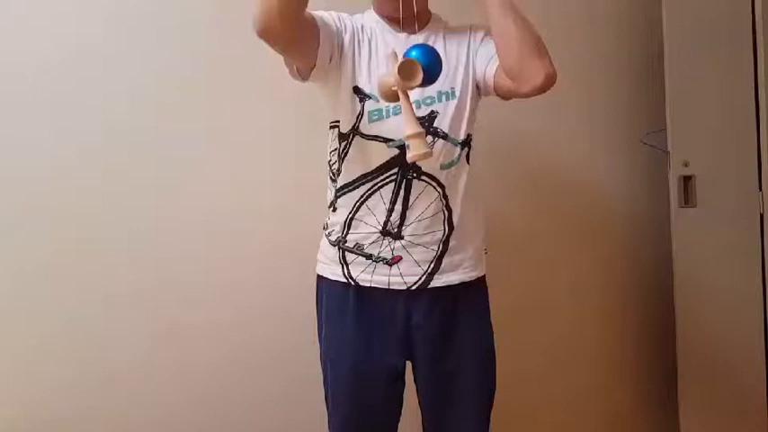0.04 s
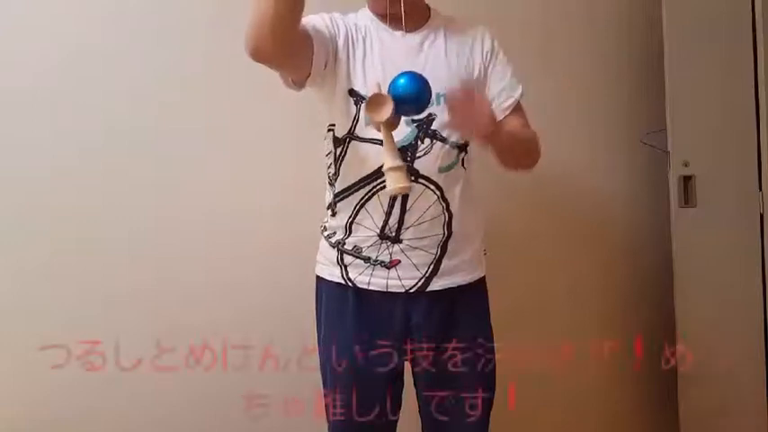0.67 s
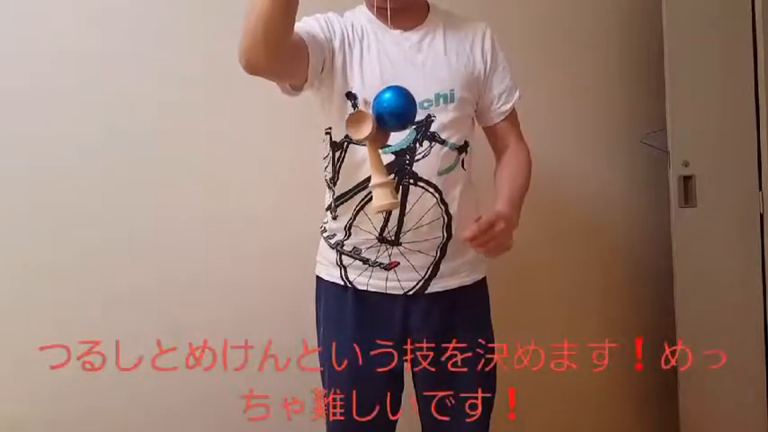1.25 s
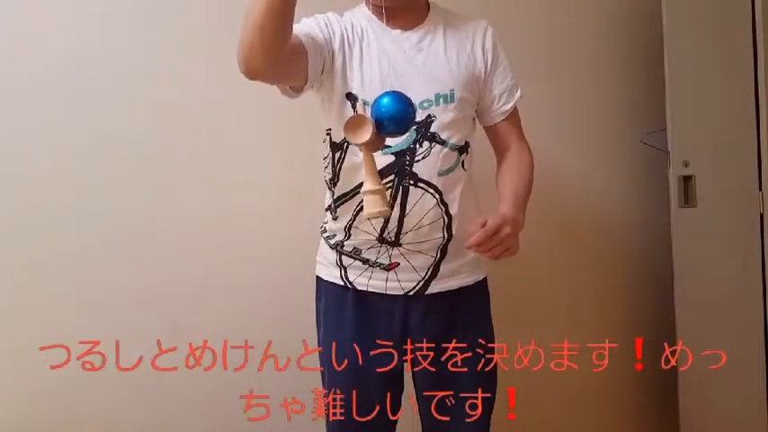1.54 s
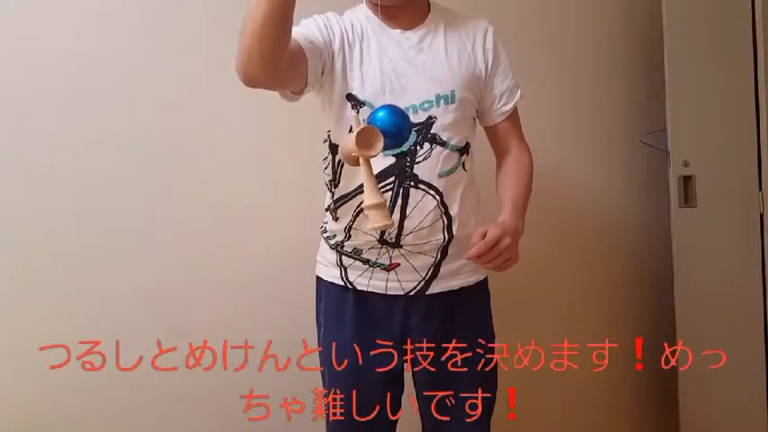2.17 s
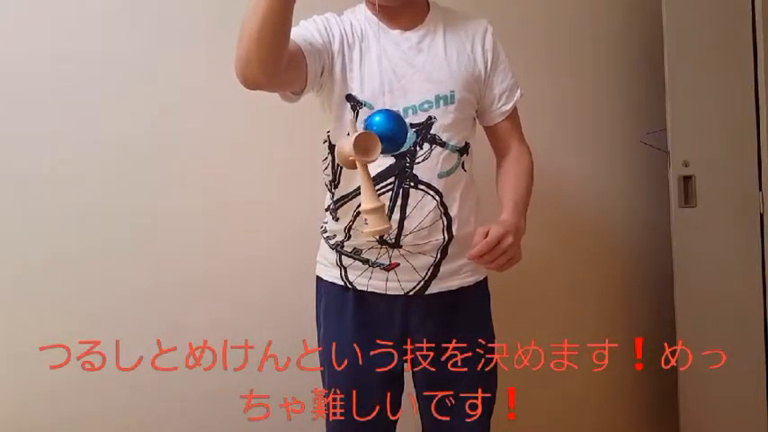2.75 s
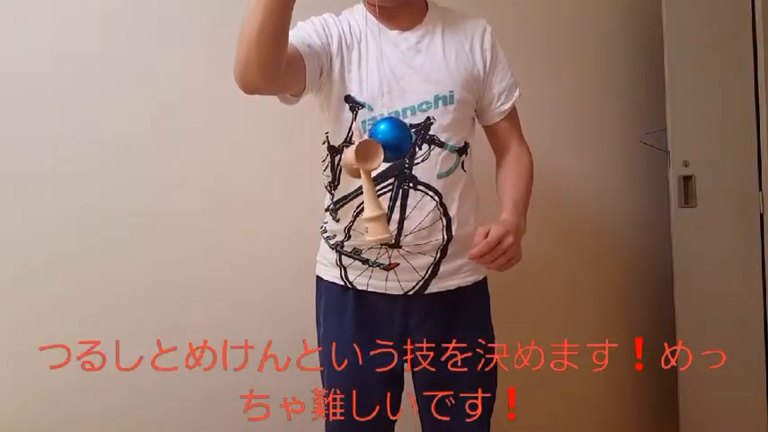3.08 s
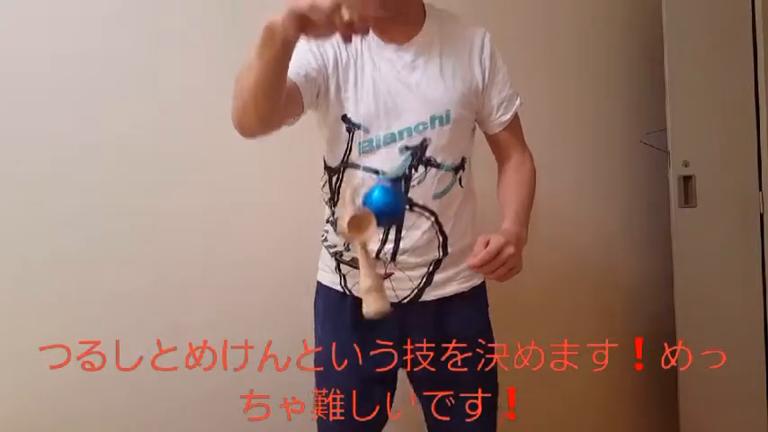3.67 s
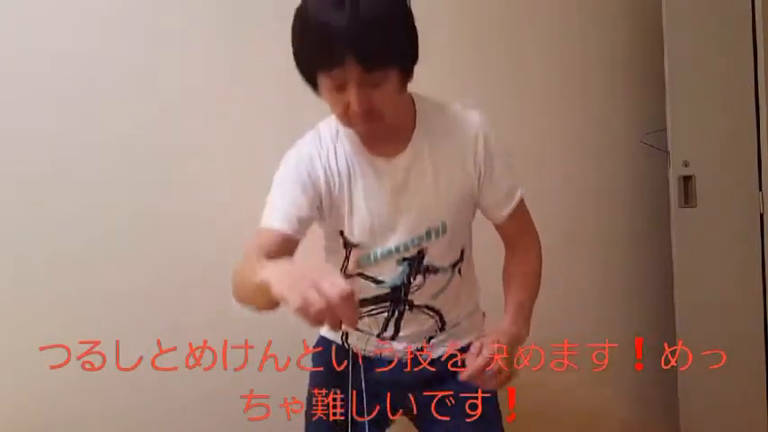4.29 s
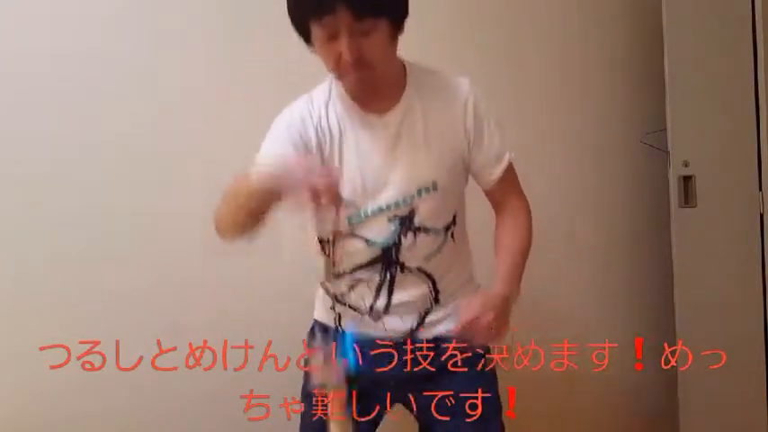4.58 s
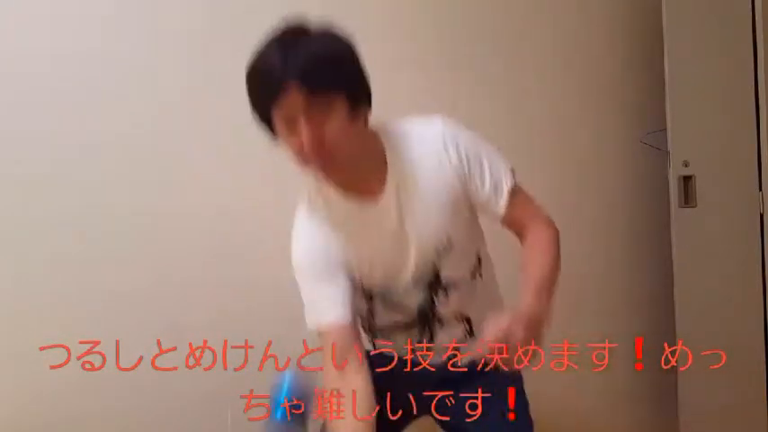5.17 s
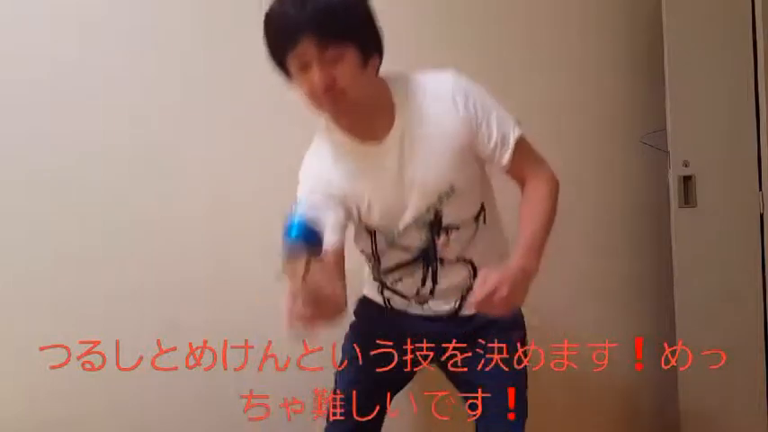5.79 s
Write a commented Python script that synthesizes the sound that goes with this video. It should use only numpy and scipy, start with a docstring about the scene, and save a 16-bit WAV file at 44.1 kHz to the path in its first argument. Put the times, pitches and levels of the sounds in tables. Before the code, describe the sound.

A soft, steady ventilation rumble fills a small, quiet room. A wooden kendama hanging on its string gives a few faint, scattered ticks, and clothes rustle lightly as the player moves. Near the end, ball and handle meet in two sharp clacks in quick succession, then settle with barely audible taps. The microphone is nearby, and the bare walls add a short echo.

```python
"""A soft ventilation rumble fills a small, quiet room; a kendama ticks faintly on its string.
The toy is swung up, ball and handle meet in two sharp wooden clacks, then settle softly.
Each contact is a brief crack, then low room tones and the wood's higher ring; bare walls answer.
Clothes rustle as the player dips and lunges."""
import sys
import numpy as np
from scipy import signal
from scipy.fft import rfft, irfft
from scipy.io import wavfile
from scipy.ndimage import uniform_filter1d

SR = 44100
rng = np.random.default_rng(int(sys.argv[2]) if len(sys.argv) > 2 else 0)


def persist_wave(psi):
    """Save psi, clipped to +-1, as 16-bit WAV."""
    counts = np.round(np.clip(psi, -1, 1) * 32767).astype(np.int16)
    wavfile.write(sys.argv[1], SR, np.atleast_2d(counts).T)


N = 266364
TIME_S, NOISE_HZ = np.arange(N) / SR, np.fft.rfftfreq(N, 1 / SR)
IR_SAMPLES = 32768  # one knock or room response
AGE_S, IR_HZ = np.arange(IR_SAMPLES) / SR, np.fft.rfftfreq(IR_SAMPLES, 1 / SR)


def undb(db):
    """Decibels to gain."""
    return 10 ** (np.asarray(db) / 20)


def curve_db(table, hz):
    """A table's level, interpolated over log frequency."""
    rows = np.array(table, float)
    return np.interp(np.log(np.maximum(hz, 1)), np.log(rows[:, 0]), rows[:, 1])


def min_phase(gain):
    """Spectrum of the most compact causal response with this gain."""
    cepstrum = irfft(np.log(np.maximum(gain, 1e-6)))
    cepstrum[1:IR_SAMPLES // 2] *= 2
    cepstrum[IR_SAMPLES // 2 + 1:] = 0
    return np.exp(rfft(cepstrum))


def stereo_noise(gain, side_gain):
    """Shaped noise with mid rms 1; side_gain scales the part that differs between the ears."""
    mid, side = rfft(rng.standard_normal((2, N))) * gain
    mid, side = irfft(mid, N), irfft(side * side_gain, N)
    return np.array([mid + side, mid - side]) / np.std(mid)


# Air rush and hiss: f/Hz, relative density/dB
RUSH_SPECTRUM = [(25, -22.5), (55, -20), (80, -1), (110, -11.5), (140, -3), (290, -8), (430, -9),
                 (680, -17.5), (900, -18), (1300, -26), (1800, -26.5), (3200, -35), (6000, -40),
                 (9500, -44.5), (13000, -43.5)]
# Stereo width of the air: f/Hz, side minus mid/dB
RUSH_WIDTH = [(60, -17.5), (110, -24), (200, -12), (380, -9.5), (690, -6), (1270, -2.5), (2350, -1.5),
              (4320, -0.5), (7970, 0.5), (14700, 0)]
# Humming room resonances: f/Hz, width/Hz, mid rms/dB
DRONE_MODES = [(79.6, 11.3, -64), (138.6, 13, -65), (164.4, 10, -70.5), (222.3, 24, -66.5),
               (297.8, 5.2, -67), (815, 16, -75.5)]

def ventilation(rush_db=-56.5):
    """Moving air rushes steadily and keeps a few narrow room resonances humming."""
    side_gain = undb(curve_db(RUSH_WIDTH, NOISE_HZ))
    rush = undb(rush_db) * stereo_noise(undb(curve_db(RUSH_SPECTRUM, NOISE_HZ)), side_gain)
    drone = 0
    for hz, width_hz, db in DRONE_MODES:
        resonance = 1 / (1 + 2 * ((NOISE_HZ - hz) / width_hz) ** 2)
        drone += undb(db) * stereo_noise(resonance, side_gain)
    return rush + drone


# Resonances that ring after each knock: f/Hz, relative level/dB, t60 before extra damping/s
KNOCK_RESONANCES = [(550, -11, .15), (730, -10, .11), (822, -8, .08), (875, -10, .07), (948, -5, .055),
                    (1070, -6, .06), (1247, -14, .08), (1355, -8, .06), (1570, -12, .05), (1790, -8, .04),
                    (2650, -14, .025), (3180, -13, .01), (3420, -8, .011), (3860, -14.5, .34),
                    (3945, -18.5, .09), (3900, -3.5, .012), (4800, -13, .005), (6750, -13, .005),
                    (7250, -13, .005)]

def knock_ring(damping_per_s):
    """Low room tones and the wood's higher ring; extra damping shortens them all."""
    ring = 0
    for hz, db, t60_s in KNOCK_RESONANCES:
        decay_per_s = np.log(1000) / t60_s
        envelope = np.sqrt(decay_per_s / SR) * np.exp(-(decay_per_s + damping_per_s) * AGE_S)
        ring += undb(db) * envelope * np.sin(2 * np.pi * hz * AGE_S)
    return ring


def edge_tick(decay_s=.0015, low_hz=3000, high_hz=8500):
    """Spectrum of the tiny crunch of rubbing edges."""
    grain = rng.standard_normal(IR_SAMPLES) * np.exp(-AGE_S / decay_s)
    band = IR_HZ / np.hypot(IR_HZ, low_hz) / np.hypot(1, (IR_HZ / high_hz) ** 3)
    return rfft(grain / np.linalg.norm(grain)) * min_phase(band)


# Recoil of ball and handle: f/Hz, relative level/dB
CRACK_SPECTRUM = [(150, -1), (400, -5), (630, -7.5), (820, 6), (1050, 5), (1500, 2.5), (1950, 4),
                  (2400, -0.5), (2800, 0.5), (3500, -1.5), (4300, -13), (5800, -16.5), (7000, -1.5),
                  (9000, -21), (14000, -53)]

def knock(low_hz, high_hz, ring_db, damping_per_s, spot_hz, spot_width_hz, spot_db, tick_db):
    """Wood on wood: a recoil crack, ringing resonances and an edge tick."""
    crack = min_phase(undb(curve_db(CRACK_SPECTRUM, IR_HZ)))
    ring = undb(ring_db) * rfft(knock_ring(damping_per_s))
    tick = undb(tick_db) * edge_tick()
    # A blow on an antinode lifts a resonance; on a node it mutes it.
    spot = min_phase(undb(spot_db / (1 + ((IR_HZ - spot_hz) / spot_width_hz) ** 2)))
    # Longer contact cuts treble; small parts radiate little bass.
    contact = min_phase(1 / np.sqrt(1 + (IR_HZ / high_hz) ** 18))
    ratio = 1j * IR_HZ / low_hz
    radiation = ratio ** 2 / (ratio ** 2 + np.sqrt(2) * ratio + 1)
    # The toy's whole length radiates, spreading the pulse.
    spread_s = .0005 * IR_HZ / (IR_HZ + 3000)
    spread = np.exp(-2j * np.pi * spread_s * IR_HZ)
    return irfft(((crack + ring) * spot * contact + tick) * radiation * spread)


# Contacts: t/s, relative level/dB, high-pass/Hz, low-pass/Hz, ring/dB, extra damping/(1/s),
# struck-spot f/Hz, spot half width/Hz, spot gain/dB, edge tick/dB
CONTACTS = [(0.4763, -39.5, 1700, 5000, -2, 25, 4080, 300, 2, -19),
            (0.51, -43.3, 1600, 3300, 7, 70, 3000, 300, 3, -19),
            (3.337, -36.5, 1400, 3000, -15, 110, 1900, 500, 0, -19),
            (4.272, -27, 1750, 4500, -19, 240, 2400, 450, 3, -16),
            (4.287, -37, 1740, 4000, -22, 240, 2400, 450, 1, -19),
            (4.6293, -35.5, 1600, 3540, -16, 83, 2000, 400, 3, -19),
            (5.0287, -36, 2400, 4200, -15, 30, 3470, 200, 7, -19),
            (5.3005, -2, 1300, 8950, -13, 230, 2280, 260, -9, -16),
            (5.3015, 0.1, 3360, 4520, 7.5, 3, 3100, 300, 4, -20),
            (5.3032, 3, 775, 2000, -5, 19, 2300, 200, -3.5, -21),
            (5.517, -1.66, 1170, 3200, -1, 360, 3480, 120, 11, -18.5),
            (5.768, -55, 1200, 1004, 20, 60, 810, 70, 14.5, -19),
            (5.856, -48.5, 1200, 1320, 20.5, 140, 817, 70.8, 16.5, -19)]

def kendama(gain_db=2):
    """The toy's knocks: faint ticks, two sharp clacks, soft settling."""
    knocks = np.zeros(N + IR_SAMPLES)
    for start_s, db, *timbre in CONTACTS:
        start = int(start_s * SR)
        knocks[start:start + IR_SAMPLES] += undb(db + gain_db) * knock(*timbre)
    return knocks[:N]


def arrival(delay_s, left_lead_s):
    """Spectra of one wave reaching the left and right microphone ports."""
    return np.exp(-2j * np.pi * IR_HZ * np.array([[delay_s], [delay_s + left_lead_s]]))


# Floor, wall and ceiling echoes: delay/s, level/dB, left lead/s
REFLECTIONS = [(.0031, -8.5, .00008), (.0048, -12, -.00012), (.008, -5.5, -.0001), (0.0165, -20.5, .0001),
               (0.029, -19, -0.012)]

def early_echoes(cutoff_hz=5000, scatter_s=.000585):
    """Spectra of the first echoes, dulled and smeared by uneven walls."""
    dulling = min_phase(1 / np.hypot(1, (IR_HZ / cutoff_hz) ** 2))
    smear = np.exp(-2j * np.pi * scatter_s * cutoff_hz * np.log1p(IR_HZ / cutoff_hz))
    echoes = sum(undb(db) * arrival(delay_s, lead_s) for delay_s, db, lead_s in REFLECTIONS)
    return dulling * smear * echoes


# Reverberation: f/Hz, relative level/dB, t60/s
TAIL_BANDS = [(152, 16, 0.38), (480, 2.5, 0.47), (830, 3.5, 0.23), (1320, 1.8, 0.24), (2230, -1.1, 0.21),
              (3700, -7.5, 0.25), (4900, -2.5, 0.34), (6940, 0, .25), (14100, -9, 0.43)]

def diffuse_tail(gain_db=3, build_s=.0014, port_gap_s=.00041):
    """Spectra of the room's reverberation, each band dying at its own rate."""
    coherence = np.sinc(2 * IR_HZ * port_gap_s)  # close ports hear long waves alike
    weights = np.sqrt(np.array([1 + coherence, 1 - coherence]) / 2)
    mid, side = rfft(rng.standard_normal((2, IR_SAMPLES))) * weights
    field = np.array([mid + side, mid - side])
    log_centres = np.log([row[0] for row in TAIL_BANDS])
    tail = 0
    for share, (_, _, t60_s) in zip(np.eye(len(TAIL_BANDS)), TAIL_BANDS):
        band = irfft(field * np.interp(np.log(IR_HZ + 1), log_centres, share))
        tail += band * np.exp(-np.log(1000) * AGE_S / t60_s)
    spectra = rfft(tail * (1 - np.exp(-(AGE_S / build_s) ** 2)))
    # Overlapping modes share energy evenly among neighbouring bands.
    power = uniform_filter1d(np.mean(np.abs(spectra) ** 2, axis=0), size=120)
    return spectra * min_phase(undb(gain_db + curve_db(TAIL_BANDS, IR_HZ)) / np.sqrt(power))


# Port imbalance towards the toy: f/Hz, left minus right/dB
PORT_BALANCE = [(300, 2.5), (1200, -0.5), (2400, 2.5), (4000, -4), (7500, -5), (10000, 10), (14000, 14)]

def room(source, left_lead_s=.00007):
    """Direct sound, echoes and tail reach two microphone ports, each with its own colour."""
    response = arrival(0, left_lead_s) + early_echoes() + diffuse_tail()
    balance_db = curve_db(PORT_BALANCE, IR_HZ)
    ports = np.array([min_phase(undb(sign * balance_db / 2)) for sign in (1, -1)])
    return signal.fftconvolve(source[None], irfft(response * ports), axes=1)[:, :N]


# Sliding cloth: f/Hz, relative density/dB
CLOTH_SPECTRUM = [(300, -11), (900, 0), (1800, 2.5), (4000, -3.5), (7000, -5.5), (10000, -12.5),
                  (14000, -18)]
# Dip, swing and lunge: peak t/s, 1/e half length/s, level/dB
PLAYER_MOVES = [(4.08, 0.62, -78), (4.86, 0.15, -75.5), (5.53, 0.41, -67)]

def clothes(folds_per_s=25, flutter_db=2.2, wide_above_hz=1500):
    """Cloth slides unevenly, swelling and fading with the speed of each move."""
    side_gain = NOISE_HZ / np.hypot(NOISE_HZ, wide_above_hz)
    slide = stereo_noise(undb(curve_db(CLOTH_SPECTRUM, NOISE_HZ)), side_gain)
    folds_db = flutter_db * np.interp(TIME_S * folds_per_s, np.arange(N), rng.standard_normal(N))
    swell = sum(undb(db) * np.exp(-((TIME_S - peak_s) / half_s) ** 2)
                for peak_s, half_s, db in PLAYER_MOVES)
    return slide * swell * undb(folds_db)


def scene():
    """The toy in the room, over ventilation and rustling clothes."""
    return room(kendama()) + ventilation() + clothes()


def record(dry, start_s=.183, fade_s=.0063, cutoff_hz=14300):
    """Brief silence, a quick fade-in and a steep treble cut."""
    fade_in = np.clip((TIME_S - start_s) / fade_s, 0, 1)
    lowpass = signal.ellip(10, .2, 70, cutoff_hz, fs=SR, output="sos")
    return signal.sosfilt(lowpass, dry * fade_in)


dry = scene()
out = record(dry)
persist_wave(out)
```